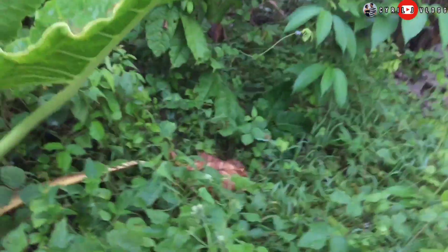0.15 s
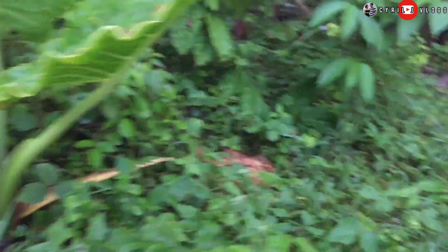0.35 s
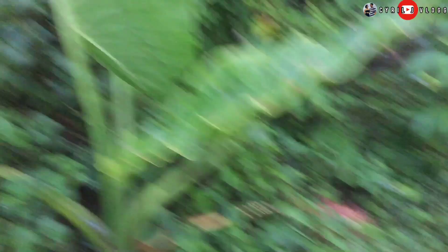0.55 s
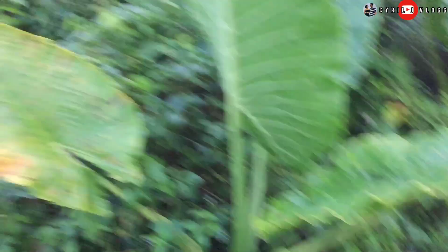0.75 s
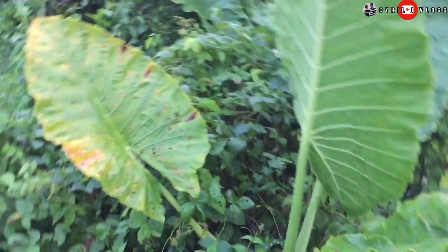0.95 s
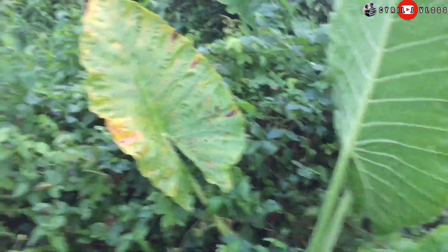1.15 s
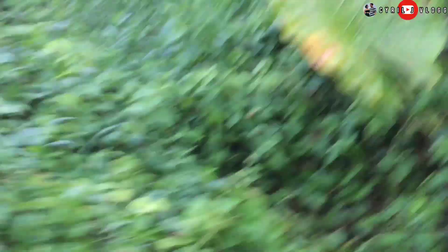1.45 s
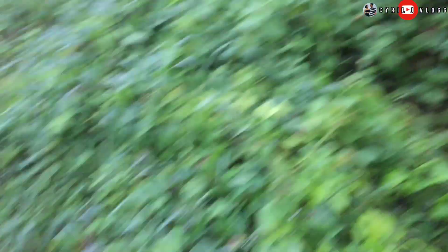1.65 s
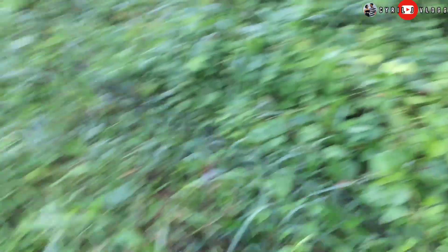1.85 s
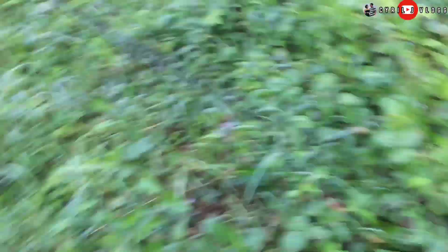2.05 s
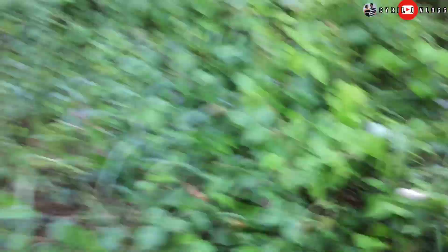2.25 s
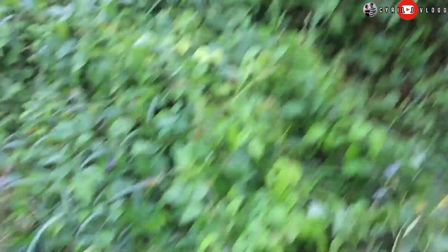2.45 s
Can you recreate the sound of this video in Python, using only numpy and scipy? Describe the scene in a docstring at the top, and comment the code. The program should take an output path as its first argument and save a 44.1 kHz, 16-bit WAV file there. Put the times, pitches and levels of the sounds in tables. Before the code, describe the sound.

Pushing through rustling plants with one sharp leaf slap, as crickets chirp and a rooster crows.

```python
"""Pushing through dense undergrowth

Leaves swish past a handheld camera, which rumbles as it is jostled; then one leaf slaps hard
close to the microphone and rustles out. All around, crickets chirp and trill with their wings
and a small bird peeps. Farther off a hen clucks and a rooster crows, echoing among the plants."""
import sys
import numpy as np
from scipy import signal
from scipy.io import wavfile
from scipy.ndimage import uniform_filter1d

SR = 44100
rng = np.random.default_rng(int(sys.argv[2]) if len(sys.argv) > 2 else 0)


def materialize(psi):
    """Save the field psi as 16-bit PCM at rate SR to the path in sys.argv[1].

    A 1-D psi becomes a single channel; in a 2-D psi each row is a channel.
    """
    bounded = np.clip(np.atleast_2d(psi).T, -1, 1)
    quanta = np.round(bounded * 32767).astype(np.int16)
    wavfile.write(sys.argv[1], SR, quanta)


N = 114660
T = np.arange(N) / SR


def from_db(db):
    """Decibels to gain."""
    return 10 ** (np.asarray(db) / 20)

def unit_power(x):
    """Scale to a mean power of one."""
    return x / np.sqrt(np.mean(x ** 2) + 1e-20)

def evened(x):
    """Hold the short-term power at one."""
    return x / np.sqrt(uniform_filter1d(x ** 2, size=2000) + 1e-12)

def curves(rows):
    """Each column after the first as a curve over time."""
    times, *columns = np.transpose(rows)
    return [np.interp(T, times, column) for column in columns]

def band(x, low, high):
    """Band-pass between two frequencies in Hz."""
    edges = [max(low, 10), min(high, .45 * SR)]
    return signal.sosfilt(signal.butter(2, edges, "band", fs=SR, output="sos"), x)

def white():
    """Plain noise."""
    return rng.standard_normal(N)

def hiss(hz, width):
    """Narrow noise of unit power."""
    return unit_power(band(white(), hz - width / 2, hz + width / 2))

def drift(hz):
    """A random wander of unit power, mostly slower than hz."""
    r = np.exp(-2 * np.pi * hz / SR)
    return unit_power(signal.lfilter([1], [1, -2 * r, r * r], rng.standard_normal(2 * N))[N:])

def coloured(spectrum, source, envelope=lambda hz: 1):
    """Third-octave bands of a source, unit power in all, each then shaped in time."""
    hzs, dbs = np.transpose(spectrum)
    edges = 22 * 2 ** (np.arange(30) / 3)
    draws, out, power = (source(), source()), 0, 0
    for k, (low, high) in enumerate(zip(edges, edges[1:])):
        hz = np.sqrt(low * high)
        octaves_outside = abs(np.log2(hz / np.clip(hz, hzs[0], hzs[-1])))
        db = np.interp(np.log(hz), np.log(hzs), dbs) - 20 * octaves_outside
        part = band(draws[k % 2], low, high) * from_db(db)
        out += part * envelope(hz)
        power += np.mean(part ** 2)
    return out / np.sqrt(power)

def swells(rows):
    """Envelopes summed in power; rise and fall are seconds per 20 dB."""
    return np.sqrt(sum(from_db(db - 20 * np.maximum((peak - T) / rise, (T - peak) / fall)) ** 2
                       for peak, db, rise, fall in rows))

def decay(start, t60, hold=0):
    """A sudden start, a hold, then a fall of 60 dB in t60 seconds."""
    return (T >= start) * from_db(-60 * np.maximum(T - start - hold, 0) / t60)

def note(centre, hz, db, length, fall_hz_per_s):
    """A rounded, gliding whistle."""
    t = T - centre
    window = np.cos(np.pi * np.clip(t / length, -.5, .5))
    return from_db(db) * np.sqrt(2) * window * np.sin(2 * np.pi * (hz * t - fall_hz_per_s * t * t / 2))


# The background of the thicket. Each row: frequency in Hz, spectral density in dB.
AIR_SPECTRUM = [(88, -27), (150, 3), (428, -5.5), (656, -6.5), (1320, -12.5), (3760, -15), (5130, -20),
                (6110, -25), (9360, -25), (15500, -26)]

def still_air():
    """A faint, steady hush all around the microphone."""
    return from_db(-69) * coloured(AIR_SPECTRUM, white)


# Insects deep in the growth. Each row: frequency in Hz, width in Hz, level in dB.
CHORUS_BANDS = [(4990, 630, -70), (6850, 410, -83), (9200, 680, -80.5)]

def insect_chorus():
    """Many distant insects merge into throbbing bands of noise."""
    return sum(from_db(db + 2 * drift(13)) * hiss(hz, width) for hz, width, db in CHORUS_BANDS)


# A trill swelling in the background. Each row: time in seconds, level in dB.
TRILL_LEVELS = [(0, -102), (0.42, -91), (0.58, -79), (1.2, -77.5), (1.4, -72.5), (1.7, -70), (2.0, -75),
                (2.2, -69), (2.6, -75)]

def trill(pitch_hz=6490, strokes_per_s=46):
    """Fast, uneven wing strokes pulse a high tone; a higher insect's buzz swells with it."""
    stroke_phase = 2 * np.pi * np.cumsum(strokes_per_s + 4 * drift(9.1)) / SR
    strokes = (1 + 0.51 * np.sin(stroke_phase)) * from_db(3 * drift(45))
    tone = np.sin(2 * np.pi * np.cumsum(pitch_hz + 70 * drift(110)) / SR)
    buzz = from_db(-4) * hiss(9360, width=420)
    return from_db(curves(TRILL_LEVELS)[0]) * (unit_power(strokes * tone) + buzz)


# Bumps and harder jolts, right at the microphone.
# Each row: peak time in seconds, level in dB, rise and fall in seconds.
CAMERA_BUMPS = [(0.01, -43, 0.22, 0.027), (0.33, -60.5, 0.16, 0.051), (0.47, -56.5, 0.044, 0.044),
                (0.535, -51.5, 0.082, 0.1), (0.655, -44.5, 0.11, 0.064), (0.78, -52.5, 0.025, 0.06),
                (0.915, -50, 0.073, 0.034), (1.025, -48.5, 0.11, 0.11), (1.08, -51, 0.043, 0.05),
                (1.258, -40.5, 0.081, 0.043), (1.375, -53, 0.11, 0.067), (1.85, -64, 0.95, 0.43),
                (2.1, -54.5, 0.11, 0.15)]
CAMERA_JOLTS = [(0.64, -59, 0.086, 0.07), (1.26, -48, 0.058, 0.032), (2.295, -47, 0.021, 0.037)]
# The camera's rumble. Each row: frequency in Hz, spectral density in dB.
RUMBLE_SPECTRUM = [(25, -22), (53, 4), (87, 3), (171, -15), (217, -19), (244, -27.5), (330, -30.5),
                   (430, -70), (730, -120)]

def camera_handling():
    """Jostling carries through the camera body as low thuds over a steady rumble."""
    rumble = np.hypot(swells(CAMERA_BUMPS), from_db(-70.5)) * coloured(RUMBLE_SPECTRUM, white)
    return rumble + swells(CAMERA_JOLTS) * hiss(137, width=61)


# Crickets nearby, behind leaves.
# Each row: time of the first stroke in seconds, level in dB, scattered share from 0 to 1.
CRICKET_CHIRPS = [(0.02, -57.5, 0.9), (0.17, -61.5, 0.7), (0.259, -62, 0.6), (0.385, -62, 0.95),
                  (0.44, -62.5, 0.8), (0.495, -62, 0.5), (0.558, -68, 0.7), (0.676, -59.5, 0.8),
                  (0.905, -55, 0.4), (1.125, -60, .9), (1.142, -58, 0.3), (1.232, -73, 0.6),
                  (1.373, -58.5, 0.4), (1.612, -59.5, 0.5), (1.848, -56.5, 0.35), (2.05, -61, 1),
                  (2.115, -54.5, 0.6)]
STROKE_GAP_S, STROKE_S, STROKE_HZ, STROKE_FALL_HZ_PER_S = 0.033, 0.021, 4892, 68000

def crickets():
    """Three raspy, falling wing strokes a chirp, blurred by leaves; far crickets stroke at random."""
    near = 0
    for start, db, share in CRICKET_CHIRPS:
        chirp = 0
        for k, accent_db in enumerate([-1.5, 0, 0]):
            centre = start + k * STROKE_GAP_S + 0.0014 * rng.normal()
            hz = STROKE_HZ + 46 * rng.normal()
            stroke_db = db + accent_db + 1.5 * rng.normal()
            chirp += note(centre, hz, stroke_db, STROKE_S, STROKE_FALL_HZ_PER_S)
        scatter = white() * decay(0, t60=0.055)
        blurred = signal.fftconvolve(chirp, scatter / np.linalg.norm(scatter))[:N]
        near += np.sqrt(1 - share) * chirp + np.sqrt(share) * blurred
    triggers = (rng.random(N) < 220 / SR) * np.sign(white())  # about 220 a second
    far_stroke = note(STROKE_S, STROKE_HZ, -76.5, STROKE_S, STROKE_FALL_HZ_PER_S)
    far = signal.fftconvolve(triggers, far_stroke)[:N]
    rasp = 1 + 0.15 * drift(250)
    return band((near + far) * rasp, 4420, 5520)  # the wings radiate in this band


# A hen in the distance. Each row: time in seconds, pitch in Hz, level in dB.
HEN_CLUCKS = [(0.04, 680, -69), (0.215, 691, -71.5), (0.395, 665, -71), (0.58, 670, -73.5)]

def hen():
    """Soft, rising clucks, made husky by a fast flutter in level."""
    clucks = sum(note(*cluck, length=0.05, fall_hz_per_s=-1700) for cluck in HEN_CLUCKS)
    return clucks * (1 + 0.61 * drift(64))


# A small bird among the plants.
# Each row: time in seconds, pitch in Hz, level in dB, length in seconds, fall in Hz per second.
BIRD_PEEPS = [(0.58, 3424, -59.5, 0.052, 1560), (1.544, 3430, -59.5, 0.054, 197),
              (1.869, 3930, -64.5, 0.05, 1497), (2.039, 3590, -66.5, 0.018, 2002),
              (1.957, 2900, -75, 0.049, 5980), (2.038, 2860, -71, 0.039, 5900)]

def small_bird():
    """Thin, falling whistles."""
    return sum(note(*peep) for peep in BIRD_PEEPS)


def leaf_grains(per_s=5000, spread_db=5.5):
    """Countless tiny leaf contacts over smooth friction noise of equal power."""
    sizes = from_db(spread_db * np.minimum(rng.exponential(1, N), 4)) * rng.choice([-1, 1], N)
    contacts = unit_power(sizes * (rng.random(N) < per_s / SR))
    return unit_power(contacts + white())

def tilted(envelopes, hz):
    """Summed level at one frequency of envelopes that each have their own tilt about 3 kHz."""
    return np.sqrt(sum((envelope * from_db(tilt * np.log2(hz / 3000))) ** 2
                       for envelope, tilt in envelopes))


# Leaves passing close by. Each row: first contact and peak time in seconds, level in dB,
# rise and fall in seconds, tilt in dB per octave.
LEAF_SWISHES = [(0.709, 0.771, -41, 0.053, 0.076, 0.88), (0.79, 0.807, -47, .05, 0.099, 1.8),
                (0.838, 0.862, -54, 0.5, 0.48, 1.85), (0.937, 0.99, -54.5, 0.13, 0.16, 0.4),
                (1.047, 1.09, -55, 0.18, 0.21, 0.7), (1.51, 1.65, -60, 0.32, 0.26, 1.1),
                (2.01, 2.102, -68.5, 0.38, 0.68, 0.45), (2.391, 2.405, -50.5, 0.17, 0.33, 1.1),
                (2.52, 2.57, -54, 0.12, .2, 1.3)]
# Their friction. Each row: frequency in Hz, spectral density in dB.
SWISH_SPECTRUM = [(88, -42), (150, -25), (263, -10.5), (462, -4.5), (540, -21.5), (656, -7.5), (1200, -5),
                  (1760, -16), (2100, -11), (5230, -13), (15500, -22.5)]

def leaf_swishes():
    """Sliding leaves make a grainy, patchy swish that starts on contact."""
    rubs = [((T >= contact) * swells([swell]), tilt) for contact, *swell, tilt in LEAF_SWISHES]
    return coloured(SWISH_SPECTRUM, leaf_grains, lambda hz: tilted(rubs, hz) * from_db(1.5 * drift(13.5)))


# Ticks within arm's reach. Each row: start in seconds, level in dB, tilt in dB per octave.
STEM_TICKS = [(0.717, -51.5, 3), (0.731, -45.5, 0.5), (0.751, -43, 1.5), (0.765, -38, -3), (0.99, -61, 9),
              (2.219, -53, -4), (2.2522, -40.5, 1), (2.2665, -30, -5)]
# Sharper snaps. Each row: start in seconds, level in dB.
STEM_SNAPS = [(0.7675, -37), (0.8003, -43), (2.2757, -26), (2.2774, -19.5), (2.2807, -35), (2.366, -32)]
# The colour of both. Each row: frequency in Hz, spectral density in dB.
TICK_SPECTRUM = [(300, -3), (1500, 16), (3700, 21.5), (7500, 18.5), (10000, 10), (15500, 17)]

def stem_ticks():
    """Stems and leaf edges tick and snap in short, bright bursts."""
    ticks = [(from_db(db) * decay(start, t60=0.04), tilt) for start, db, tilt in STEM_TICKS]
    snaps = [(from_db(db) * decay(start, t60=0.004), 0) for start, db in STEM_SNAPS]
    return coloured(TICK_SPECTRUM, leaf_grains, lambda hz: tilted(ticks + snaps, hz))


# Knocks close by. Each row: peak time in seconds, level in dB, rise and fall in seconds,
# frequency and width in Hz.
STALK_KNOCKS = [(0.776, -58, 0.023, 0.057, 316, 104), (0.774, -47, 0.013, 0.037, 1170, 190),
                (0.852, -54.5, 0.017, 0.072, 1130, 170), (1.01, -55.5, 0.04, 0.028, 354, 110)]

def stalk_knocks():
    """Stalks and leaf blades knock hollowly, each in one narrow band."""
    return sum(swells([swell]) * hiss(hz, width) for *swell, hz, width in STALK_KNOCKS)


def resonate(x, centre_hz, width):
    """A resonance whose centre moves."""
    out, state = np.zeros(N), np.zeros(2)
    r = np.exp(-np.pi * width / SR)
    feedforward = [(1 - r * r) / 2, 0, (r * r - 1) / 2]
    for i in range(0, N, 256):
        feedback = [1, -2 * r * np.cos(2 * np.pi * centre_hz[i] / SR), r * r]
        out[i:i + 256], state = signal.lfilter(feedforward, feedback, x[i:i + 256], zi=state)
    return out


# A four-syllable crow, farther off. Each row: time in seconds, pitch in Hz, level in dB,
# roughness (all rasp from 1 up), throat resonance shift as a ratio, tilt in dB per octave.
ROOSTER_CROW = [(1.0, 466.7, -82, 1, 1.04, 9), (1.08, 470, -59, 1, 0.97, -6),
                (1.16, 481, -57, 0.85, 1.05, 4), (1.23, 465, -74.5, 0.5, 1.06, 2),
                (1.32, 490, -76, 1.1, 1.03, 6), (1.352, 521, -54, 0.74, 0.98, -5),
                (1.378, 534.7, -45.5, 0.01, 0.94, 0.5), (1.406, 534.7, -56.5, 0, 1.7, 12),
                (1.434, 535, -43.5, 0, 1.07, -3), (1.46, 507, -56.5, 0.53, 0.98, -6),
                (1.5, 472, -74, 0.6, 1.15, 2), (1.56, 463, -56, 0.65, 1.02, 4),
                (1.67, 519.6, -53, 1.02, 0.98, -3.5), (1.8, 492.7, -54, 0.6, 0.98, -6),
                (1.86, 465.5, -55, 0.88, 1.01, 8), (1.97, 459.5, -72.5, 0.65, 0.977, 6),
                (2.085, 450, -88, 1.1, 0.847, 10), (2.12, 449.6, -55.5, 0.97, 0.792, 5),
                (2.16, 444.4, -56.5, 0.9, 0.73, 10), (2.23, 484.2, -59, 0.47, 0.73, 1),
                (2.45, 450.7, -56, 0.9, 0.98, 1), (2.53, 434, -56, 0, 0.87, 7),
                (2.6, 424, -53.5, 0.03, 0.69, -6.5)]
# The voice has no fundamental. Each row: harmonic number, dB when clear, dB in the rasp.
CROW_HARMONICS = [(2, 0, 0), (3, -26, -13), (4, -3, -3), (5, -24, -9)]
# The rooster's throat. Each row: frequency in Hz, width in Hz, gain in dB.
THROAT_RESONANCES = [(1031, 81, -6), (1417, 57, -4), (1812, 56, 1.5), (2083, 104, -4), (2305, 29, 5)]

def rooster(rasp_hz=198, flutter_hz=33.2):
    """Clear harmonics break into a fluttering rasp, which rings in the throat."""
    hz, db, rough, shift, tilt = curves(ROOSTER_CROW)
    rough = np.clip(rough, 0, 1)
    phase = 2 * np.pi * np.cumsum(hz * (1 + 0.00403 * drift(24))) / SR
    clear = rasp = throat = 0
    for k, clear_db, rasp_db in CROW_HARMONICS:
        clear += from_db(clear_db + tilt * np.log2(k)) * np.sin(k * phase)
        noisy_harmonic = drift(rasp_hz) * np.sin(k * phase) + drift(rasp_hz) * np.cos(k * phase)
        rasp += from_db(rasp_db) * noisy_harmonic
    for centre, width, gain_db in THROAT_RESONANCES:
        gain = from_db(gain_db + tilt * np.log2(centre / 1500) + 5.5 * drift(flutter_hz))
        throat += gain * resonate(rasp, centre * shift, width)
    voice = np.sqrt(1 - rough) * evened(clear) + np.sqrt(rough) * evened(band(throat, 695, 2160))
    return (T > ROOSTER_CROW[0][0]) * from_db(db) * voice


# A broad leaf slaps close to the microphone. Each row: start in seconds, level in dB.
LEAF_SLAPS = [(2.2747, -22)]
# Its impact. Each row: frequency in Hz, spectral density in dB.
SLAP_SPECTRUM = [(53, -34), (90, -25), (335, -10), (453, -2), (538, -9.5), (883, -8), (1050, -12),
                 (1480, 4), (1800, -32), (1920, -8), (2890, -5), (3430, -3.5), (4950, -6), (5880, -3.5),
                 (15500, -12.5)]
# Leaf and stalk ring. Each row: frequency in Hz, width in Hz, spectral density in dB.
LEAF_RESONANCES = [(320.4, 81, -0.5), (1018, 71, 0.5), (3387, 93, -2.5), (4230, 120, 2)]

def leaf_slap(hold_s=0.011):
    """A dense burst of contacts with a brief ring, then a rustle as the leaves settle."""
    def envelope(hz):
        rise_s = 0.0031 * 300 / hz  # the lows build later
        level = 0
        for start, db in LEAF_SLAPS:
            attack = 1 - np.exp(-np.maximum(T - start, 0) / rise_s)
            burst = decay(start, t60=0.21, hold=hold_s)
            rustle = from_db(-6.5) * decay(start, t60=0.44)
            level += from_db(db) * attack * np.hypot(burst, rustle)
        return level
    contacts = coloured(SLAP_SPECTRUM, leaf_grains, envelope)
    ring = sum(from_db(db) * hiss(hz, width) * np.sqrt(width / 1000) for hz, width, db in LEAF_RESONANCES)
    ring_level = sum(from_db(db - 6) * decay(start, t60=0.2, hold=hold_s) for start, db in LEAF_SLAPS)
    return contacts + ring_level * ring


def among_plants(x, echoes_per_s=900):
    """The direct sound plus a cloud of dying echoes off the plants."""
    echoes = white() * (rng.random(N) < echoes_per_s / SR) * decay(0.0059, t60=0.14)
    return x + from_db(-9) * signal.fftconvolve(x, echoes / np.linalg.norm(echoes))[:N]

def scene():
    """Close leaves and handling over the animals and the still air, in mono."""
    calls = among_plants(rooster() + hen() + small_bird() + crickets())
    background = insect_chorus() + trill() + still_air()
    close = leaf_swishes() + stem_ticks() + stalk_knocks() + leaf_slap() + camera_handling()
    return (close + calls + background)[None]

def record(dry):
    """The camera cuts the treble steeply above 15.9 kHz."""
    return signal.sosfilt(signal.ellip(10, .2, 80, 15900, fs=SR, output="sos"), dry)


dry = scene()
out = record(dry)
materialize(out)
```